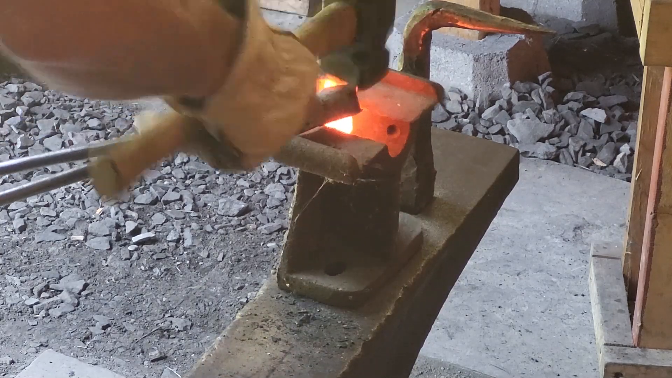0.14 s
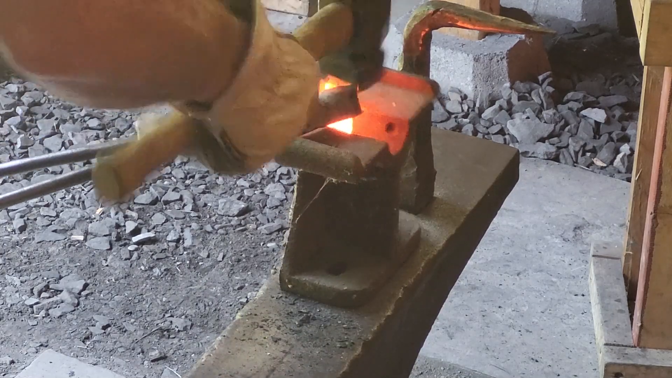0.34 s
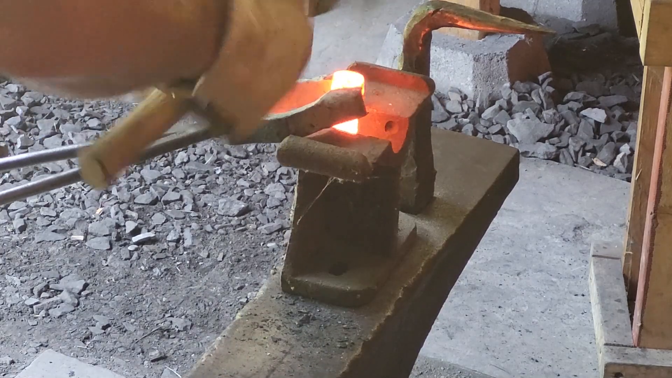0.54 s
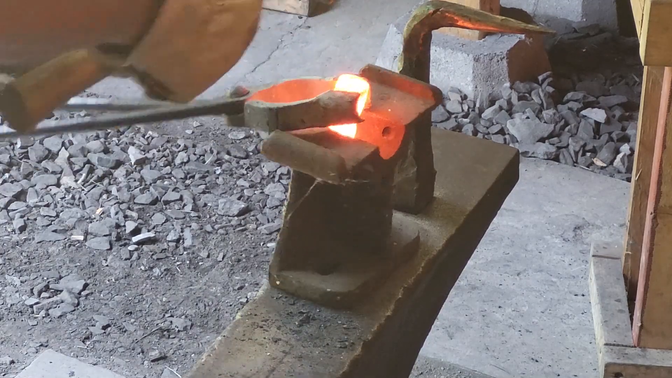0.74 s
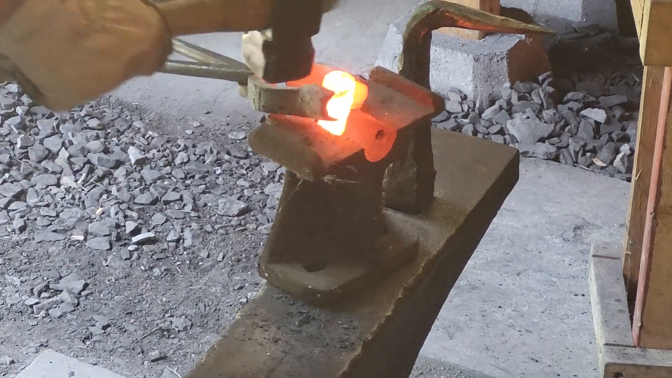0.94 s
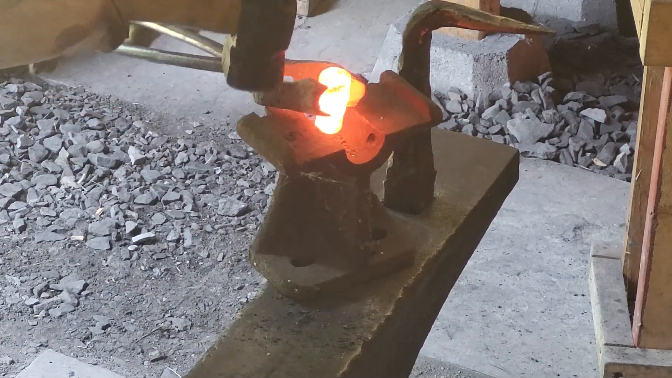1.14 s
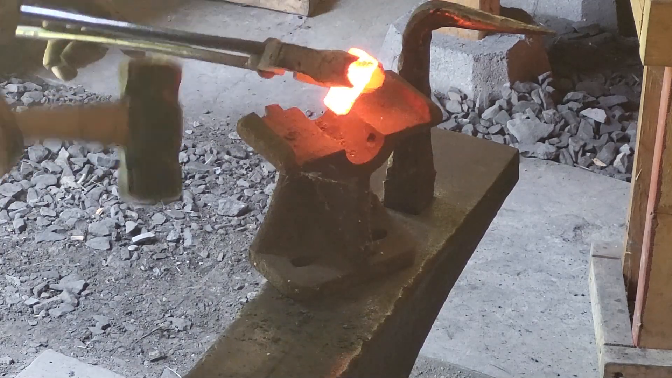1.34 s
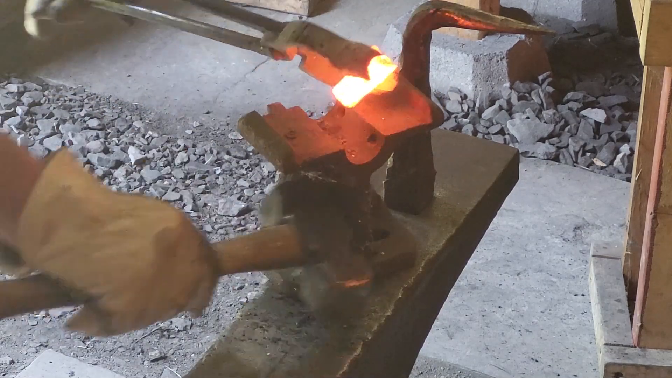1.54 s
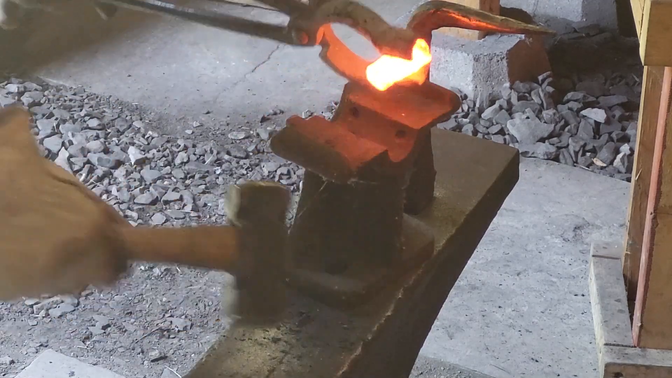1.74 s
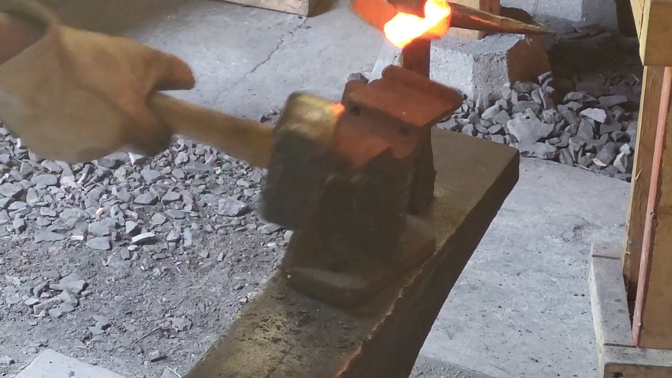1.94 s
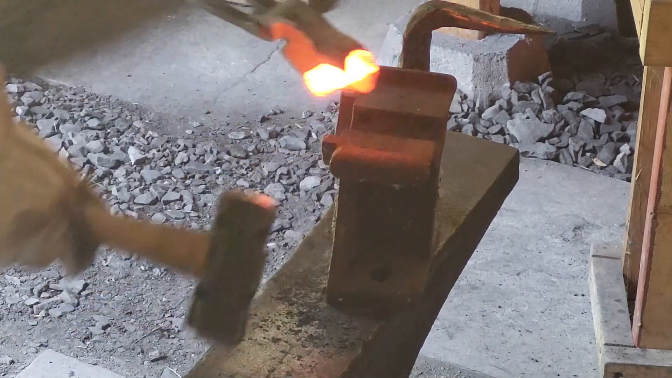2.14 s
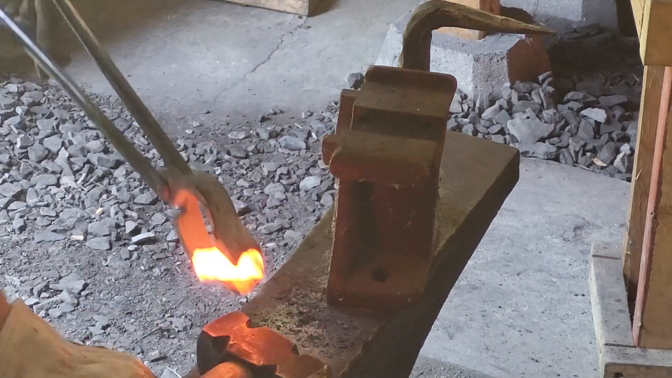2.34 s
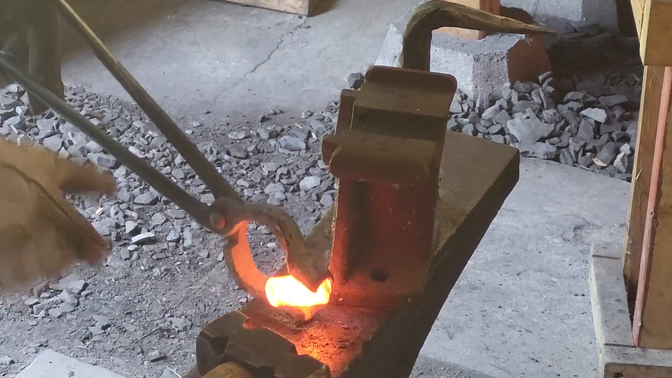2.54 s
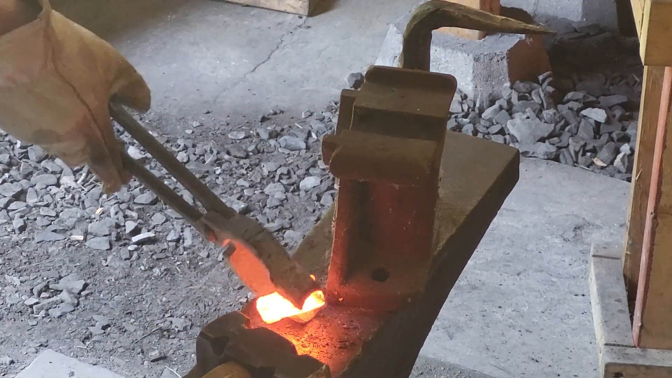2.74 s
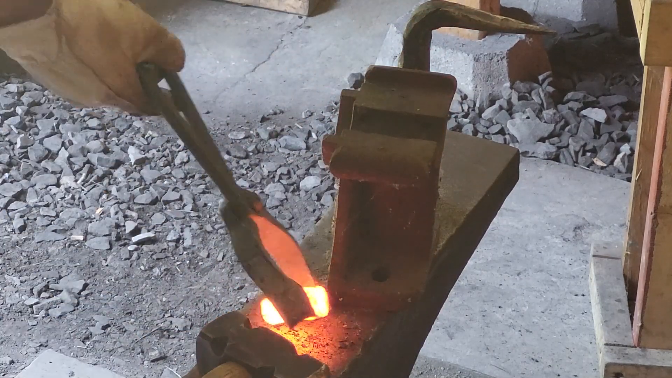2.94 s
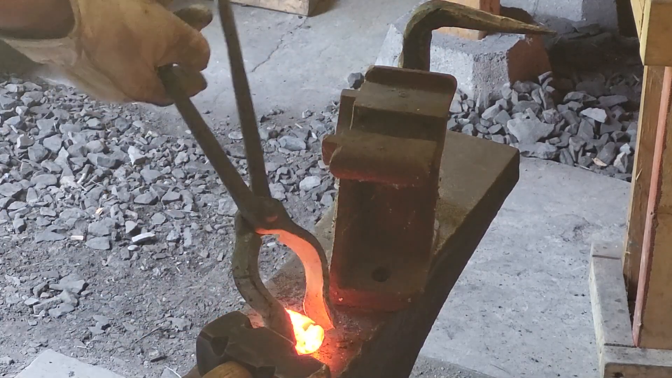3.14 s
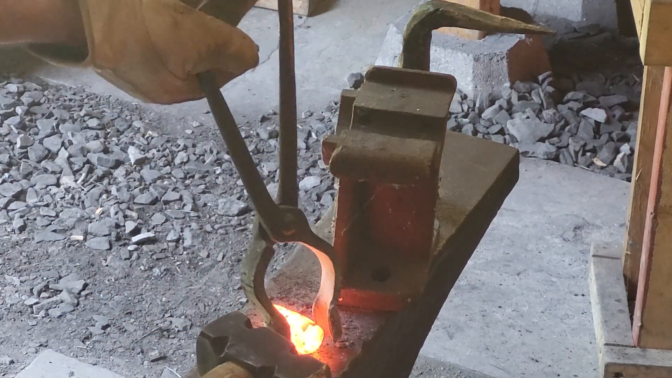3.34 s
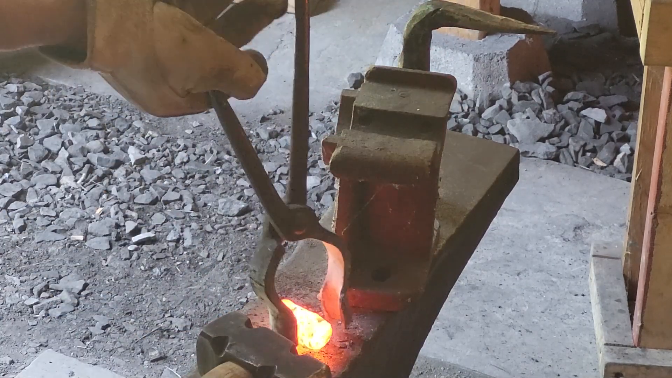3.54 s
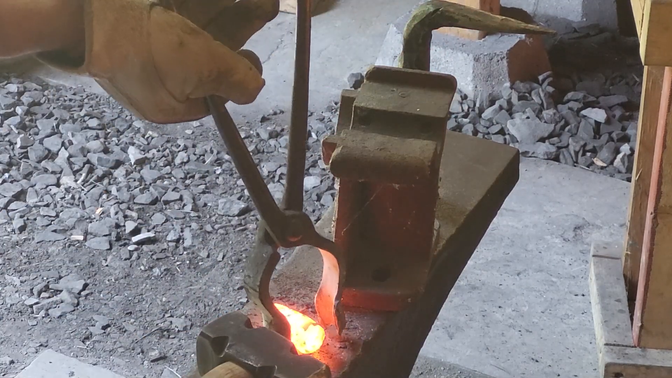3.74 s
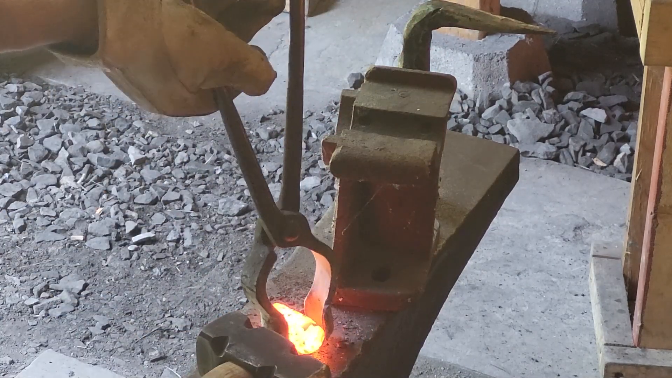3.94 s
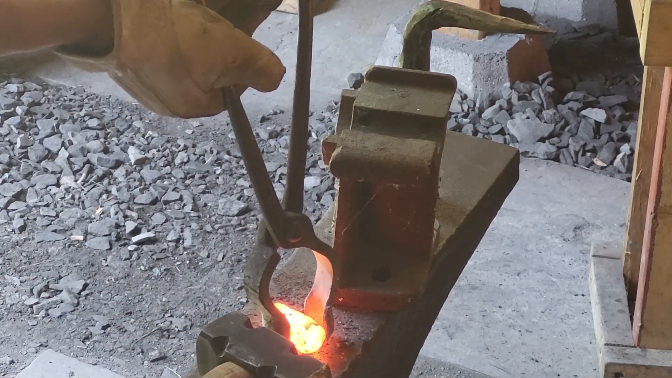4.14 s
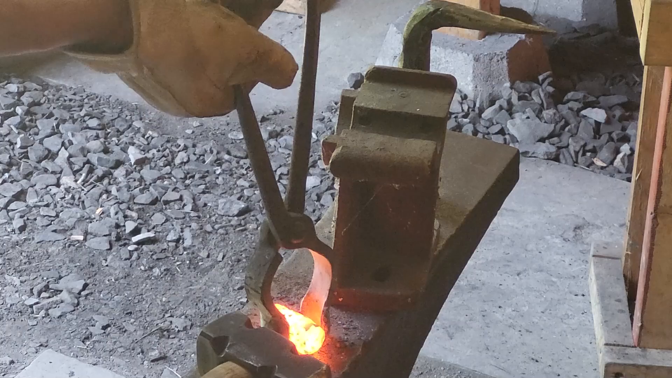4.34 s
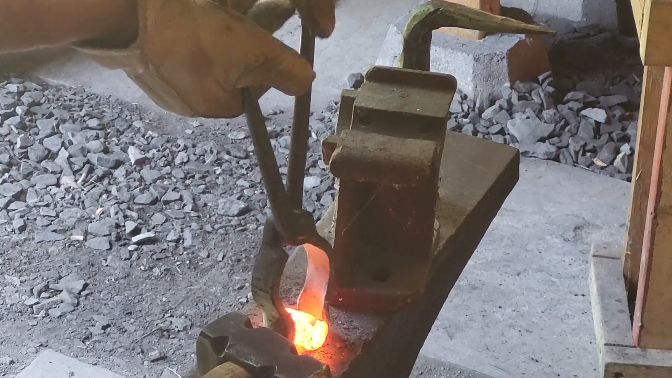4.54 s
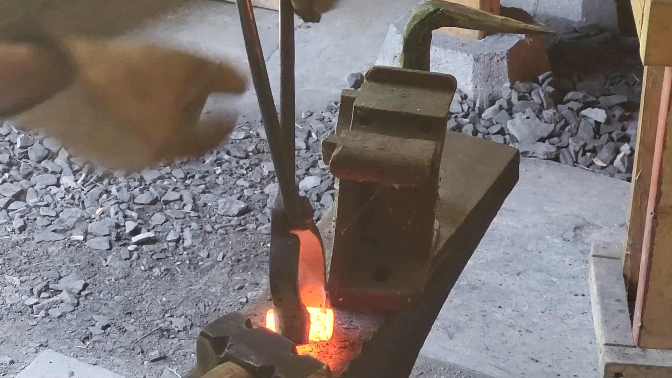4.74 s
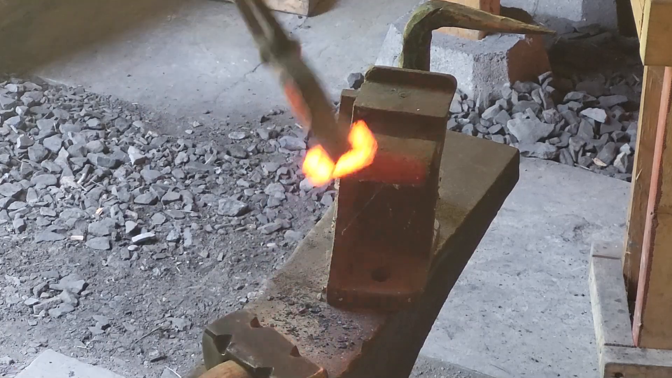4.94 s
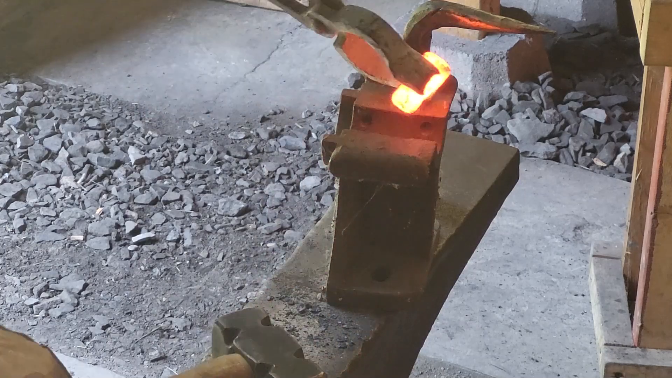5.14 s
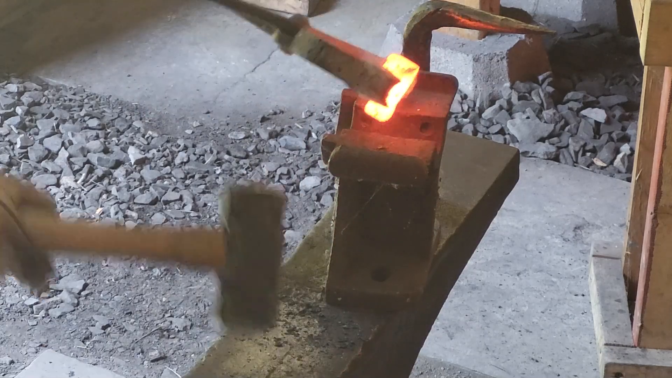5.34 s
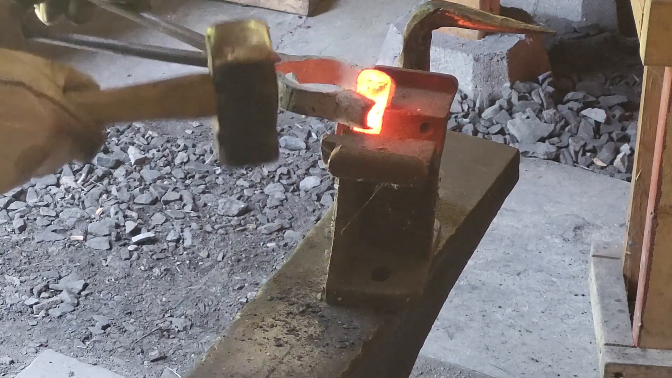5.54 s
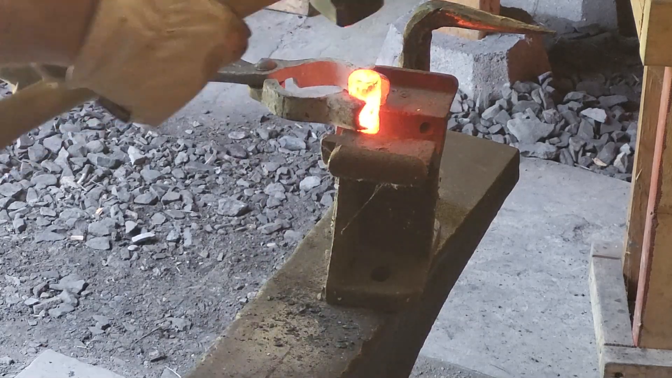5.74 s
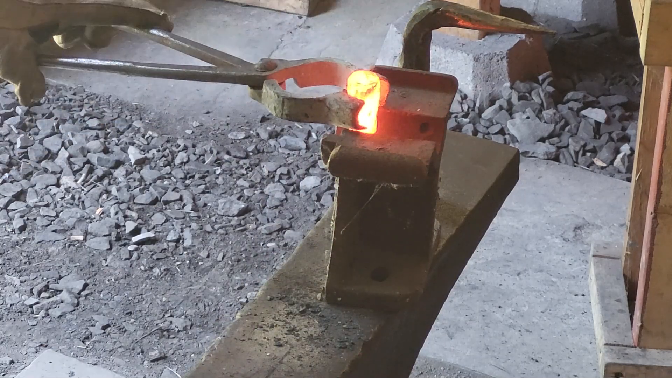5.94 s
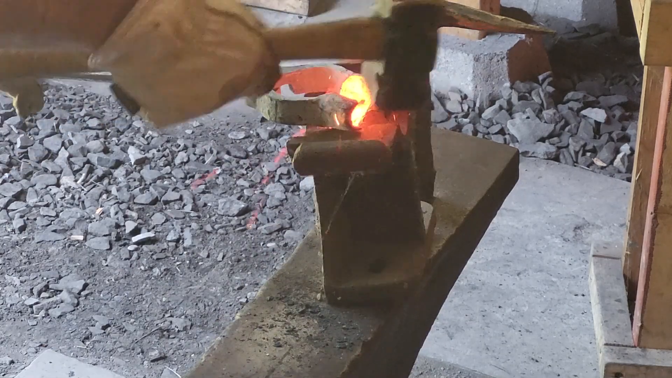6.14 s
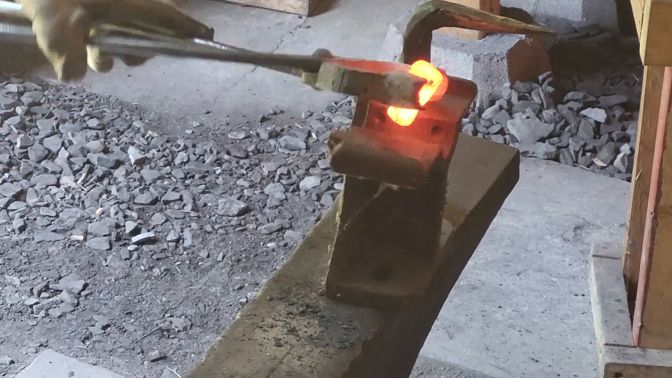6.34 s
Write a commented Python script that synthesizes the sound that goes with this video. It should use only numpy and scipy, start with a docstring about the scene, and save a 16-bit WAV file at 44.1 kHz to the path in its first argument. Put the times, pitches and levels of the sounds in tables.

```python
"""A heavy hammer blow is already ringing at the start: more blows on a small steel anvil follow.
Each one layers noise bursts (thud, crack, sizzle) with decaying modes of anvil, frame and bench, and the
tongs ring along, a long note near 2.4 kHz. Tools knock on the wood; iron and tongs scrape and drag as
shaped noise, and the scrapes also excite the anvil. Behind it lie a low rumble and an insect's faint
pulsing buzz, both filtered noise."""
import sys
import numpy as np
from scipy import signal
from scipy.fft import rfft, irfft, next_fast_len
from scipy.io import wavfile

SR = 44100
rng = np.random.default_rng(int(sys.argv[2]) if len(sys.argv) > 2 else 0)


def transcribe(signal):
    """Save signal, clipped to [-1, 1], as a 16-bit WAV file at the path in sys.argv[1]."""
    frames = np.atleast_2d(signal).T
    limited = np.clip(frames, -1, 1)
    pcm = np.round(limited * 32767).astype(np.int16)
    wavfile.write(sys.argv[1], SR, pcm)


N = 282240  # length in samples

# Hammer and iron on the anvil; force 0 is a full blow, hardness is low where soft hot iron cushions the
# steel, weight is the follow-through into the bench: (t/s, force level/dB, hardness/dB, weight/dB)
BLOWS = [(-.03, -4, -4, -2), (0.1371, -29, -5.5, 0), (.1955, -1, 1.5, -1), (.395, 0.84, 2.2, -2.5),
         (.6089, .5, -1.1, 1.5), (0.83, -38.5, -12.5, 1), (1.0842, -37, -6, -3), (1.5502, -17.5, -4, 2.5),
         (1.5605, -22.5, 0.5, -6), (1.9907, -12, 10, -4), (5.162, -19, -9.5, 4.5),
         (5.2438, -35, -11.5, -13), (5.3324, -20.5, -3.5, -6.5), (5.4385, -27.5, -14.5, -2),
         (5.4917, -25, -13.5, 10), (5.5845, -25, -9.5, 3), (5.6097, -28, -2, -13), (5.8655, -14.5, -3, 8),
         (6.151, 4, -5, -3), (6.3059, -33.5, -7.5, 9)]
# The hammer's side clinks on the anvil, levels before the layer trims:
# (t/s, crack level/dB, thud level/dB, sizzle level/dB, boom level/dB, head ring level/dB)
CLINKS = [(1.6118, -16.5, -28.5, -33.5, -42.5, -27.5)]
# Hammer, tongs and iron knock on the bench:
# (t/s, force level/dB, hardness/dB, tongs ring level over the force/dB)
KNOCKS = [(.956, -50, -26.5, -21.5), (1.355, -52.5, -27.5, -21), (2.2873, -38, 12, -2),
          (2.2965, -23.5, 10.5, -3), (2.335, -28, 5, -20), (2.6184, -43.5, -13, -15),
          (2.803, -57.5, 7, -10), (3.008, -60.5, 2.5, -4), (3.1494, -53, -18.5, -0.5),
          (3.21, -60, -12.5, 9.5), (3.4604, -54.5, -8, -22), (3.6265, -51, -12, -11.5),
          (3.69, -53, -10, -25.5), (4.012, -70.5, 8, -4), (4.411, -74, -5, 0.5), (4.5644, -47, -24, -32.5)]
# The iron bumps bare wood: (t/s, force level/dB, hardness/dB)
BUMPS = [(3.2741, -31.5, -8.5), (3.7443, -42, -25)]
# Iron and tongs scrape: (peak t/s, rise t/s, level/dB, share of the contact on the anvil 0-1)
SCRAPES = [(.06, 0.032, -36.5, 0.2), (.809, 0.032, -69.5, 0.92), (1.0, 0.021, -57, 0.99),
           (1.035, 0.019, -41, 1), (1.147, 0.025, -37.5, 0.54), (2.611, 0.03, -43.5, 0.04),
           (2.98, 0.075, -63.5, 0.11), (3.22, .04, -56.5, 0), (5.05, 0.038, -53, 0), (5.375, 0.028, -36, 1),
           (5.45, .012, -44.5, 0.8), (5.635, 0.026, -32.5, 0), (6.35, .05, -63, 0.84)]
# The tongs rasp round the iron: (peak t/s, rise t/s, fall t/s, level/dB)
GRIP_RASPS = [(4.599, 0.018, 0.05, -53.5), (4.98, 0.011, 0.15, -59.5), (5.052, 0.0095, 0.023, -58.5)]
# The insect's buzz swells: (peak t/s, rise t/s, fall t/s, level/dB)
INSECT_SWELLS = [(2.9, .6, 0.44, -75), (5.2, 0.22, 0.15, -59)]

# Ringing modes of each solid body: (f/Hz, level/dB, t60/s, left-right level/dB)
ANVIL_MODES = [(3150, -21, .16, 1.5), (3290, -13.5, 0.23, 1), (3570, -16, 0.14, -3.5), (3555, -4, 0.21, -5),
               (3587, 3.5, 0.2, -2.5), (3660, -12.5, .13, -2.5), (4030, -22, 0.098, -0.5),
               (4770, -25.5, 0.15, 2), (5760, -26.5, .16, 1), (5920, -15.5, .14, 3.5), (6577, -3.5, .19, 2),
               (6670, -15, .14, 3.5), (6850, -22.5, 0.11, 3), (7670, -22, .17, -3.5), (7740, -16, 0.22, 0),
               (7920, -13.5, 0.28, 1), (8750, -24, 0.17, 6.5), (8740, -17, .19, 6), (9380, -32.5, .36, 2),
               (10900, -18, 0.14, 4), (11870, -25.5, 0.17, 7), (12800, -22, 0.26, 8.5),
               (13910, -23.5, 0.13, 12), (14760, -26.5, .19, 12)]
FRAME_MODES = [(311.4, -2, 0.22, 0.68), (375, -7, 0.18, 1), (539.2, 4, 0.18, 0), (660, 7.5, 0.11, 0.09),
               (736.7, -11.5, .17, 0.089), (813, 4, .17, 0.12), (904, -15, 0.23, 0.2),
               (1270, -18, 0.33, 0.0029)]
BENCH_MODES = [(102.9, 4.5, 0.48, 0.92), (117.46, 5, 0.41, 0.94), (194.6, -4, 0.42, 1)]
TONGS_MODES = [(2415, 0.5, .45, 0), (2850, -7.5, 0.24, .5), (3076, 2, 0.42, -3.5), (4840, -4, .19, 1),
               (6040, -4.5, 0.23, -2.5), (10060, -6, 0.4, 13), (12300, -11.5, 0.19, 3),
               (12450, -11, 0.18, 8), (13730, -6.5, .11, 9)]
HEAD_MODES = [(2024, 0.5, 0.12, 2.2), (3130, -2, 0.36, 2), (7020, -16, .17, 1), (11000, 1.5, 0.17, 9.2),
              (11750, -9, 0.12, 9.7), (14760, -18.5, 0.3, 3)]  # hammer head
JAW_MODES = [(2470, 2.5, 0.094, 6), (4950, -10, .16, 4.5)]  # jaws of the tongs as they close

# Noise colours, relative as each noise is brought to rms 1: (f/Hz, level/dB per Hz)
THUD_COLOUR = [(40, -41), (130, -13.5), (300, -4), (550, -2), (850, 1.5), (1050, -7), (1300, -5),
               (1800, -12.5), (2600, -11.5), (4500, -30.5)]
CRACK_COLOUR = [(500, -28.5), (1500, 1.5), (2500, 5.5), (3200, 4.5), (4300, 1.5), (5700, 4), (8000, -2),
                (10000, -16.5), (14000, -29.5)]
SIZZLE_COLOUR = [(5000, -29), (8500, 1), (11000, 0), (13000, -3), (15000, -7), (16000, -6)]
WOOD_COLOUR = [(60, -32), (150, 1.5), (250, 12.5), (400, 5), (900, -1.5), (3000, -45.5)]
GRIT_COLOUR = [(120, -37), (200, -12), (316, -7.5), (448, -19), (548, 5), (659, -7.5), (1020, -5.5),
               (1530, -4.5), (2470, -9), (3130, -5.5), (6170, -11.5), (15100, -19), (16000, -19)]  # scraping strokes
SLIDE_COLOUR = [(180, -12.5), (300, -4.5), (385, -13), (574, 1.5), (737, -17), (1390, -12), (2140, -42.5),
                (2520, -15.5), (3190, -5.5), (5700, -7), (6520, -25), (6850, -59), (7570, -26.5),
                (8790, -18), (16000, -39.5)]  # the dragged iron
GRIP_COLOUR = [(290, -29), (500, -4), (635, 2), (755, -9), (874, -1), (1170, -8), (1590, -7.5), (1920, -16),
               (2430, -21), (2710, -27), (3480, -2.5), (4250, -16), (5260, -9), (6170, -16), (12000, -29),
               (15600, -59.5), (22000, -120)]  # tongs on iron
AIR_COLOUR = [(15, -75), (25, -46.5), (82, -3.5), (206, -1), (373, -15), (427, -21.5), (531, -13.5),
              (1400, -33), (2480, -39), (3080, -38), (4610, -35), (8140, -36.5), (10700, -52.5),
              (12500, -44), (16000, -34)]  # workshop rumble
BUZZ_COLOUR = [(6000, -37), (8500, -3.5), (10500, -1.5), (12500, -2.5), (15500, -7)]  # insect

# Decay of the workshop, scaled by each burst's life: (f/Hz, t60/s)
ROOM_DECAY = [(100, 0.89), (260, 0.081), (700, 0.21), (1840, 0.18), (4850, 0.16), (12800, 0.2)]
# Stereo likeness of noise: (f/Hz, left-right likeness)
ALIKE = [(60, .93), (600, 0.89), (1300, 0.43), (3000, 0), (6000, 0.054), (12000, 0.041)]
# Stereo lean of noise: (f/Hz, left-right level/dB)
LEFT_LEAN = [(100, 4.5), (300, 0), (800, 0), (2200, 1), (5500, 3.5), (9000, 8), (12000, 8.5), (15000, 11.5)]

TOP_HZ = 15900  # band limit
RING_SIZE = SR  # samples in one ring
SCATTER_DB = 1.5  # spread of a mode's strength from one contact to the next
PORT_PHASE = 1.2  # left-right phase of modes from 3 kHz up, before its wander (radians)

# Layers of a full blow, before the layer trims
FULL_CRACK_DB, FULL_THUD_DB, FULL_SIZZLE_DB, FULL_BOOM_DB = -13.5, -14.5, -23, -29.5
FULL_RING_DB, FULL_TONGS_DB = -14.5, -37.5
SIZZLE_GROWS, BOOM_GROWS, TONGS_GROW = 0.87, 0.7, 0.18  # dB per dB of force
CRACK_HARDENS, TONGS_HARDEN = 0.78, -0.42  # dB per dB of hardness
TONGS_FOLLOW = 0.6  # dB per dB of weight
TONGS_WAKE_DB, TONGS_FADE = -12, 2.2  # at light touches the tongs hardly ring: extra dB lost per dB
SHARP_DB = -0.3  # tilt of a full blow's ring at hardness 0, dB per octave
HARD_TILT = 0.1  # harder contacts wake more high modes: dB per octave per dB of hardness
LIGHT_TOUCH_TILT = 0.04  # lighter, shorter contacts do too: dB per octave per dB of lost force
SETTLE_S, SETTLE_DB = 0.037, 3.5  # after its first loud moment the ring drops by this much
ANVIL_BLUR, RING_ATTACK_S = 0.4, 0.002  # waver of the anvil's ring (radians), rise time constant

KNOCK_SIZZLE_DB, KNOCK_BOOM_DB, KNOCK_WOOD_DB = -13, -12.5, -21  # over the force, before the trims
KNOCK_SIZZLE_HARDENS = 0.55  # dB per dB of hardness
BUMP_THUD_DB, BUMP_SIZZLE_DB, BUMP_BOOM_DB = 3, -17, -32  # first two over the crack, boom over the force

SING_DB = -43.5  # drive to the anvil's singing, the same however hard it is rubbed
SCRAPE_FALL = 1.1  # a stroke's fall over its rise
FIRM_DB = -40  # level of a firm stroke
SCRAPE_BRIGHT_DB, PRESS_BRIGHTENS = 0, 0.066  # a firm stroke's tilt in dB per octave, its change per dB
DRAG_S, DRAG_END_S, DRAG_RISE_S, DRAG_DB = 1.3956, 1.548, 0.083, -42.5  # start, stop, ramp, level
BITE_S, BITE_DB = 4.955, -54.5  # the jaws close on the iron
INSECT_REST_DB = -79.5  # floor under the swells


def blows():
    """Blows on the anvil: its two strongest modes beat; the tongs ring along near 2.4 kHz."""
    out, t = np.zeros((2, N)), np.arange(RING_SIZE) / SR
    # reflections from bench and floor pile up on the ring some 20 ms after the blow
    pile_up = amp(3.5 * np.exp(-((t - 0.019) / 0.007) ** 2))
    settle = amp(-SETTLE_DB * (1 + np.tanh((t - SETTLE_S) / 0.004)) / 2)
    for s, force_db, hard_db, weight_db in BLOWS:
        crack_db = FULL_CRACK_DB + force_db + CRACK_HARDENS * hard_db
        thud_db = FULL_THUD_DB + force_db
        sizzle_db = FULL_SIZZLE_DB + SIZZLE_GROWS * force_db
        boom_db = FULL_BOOM_DB + BOOM_GROWS * force_db + weight_db
        add(out, s, impact(crack_db, thud_db, sizzle_db, boom_db, hold=0.017, clang_db=12))

        anvil_db = FULL_RING_DB + force_db + hard_db
        sharp_db = SHARP_DB - LIGHT_TOUCH_TILT * force_db + HARD_TILT * hard_db
        anvil = ring(ANVIL_MODES, attack=RING_ATTACK_S, blur=ANVIL_BLUR, tilt_db=sharp_db)
        add(out, s, amp(anvil_db) * pile_up * settle * anvil)

        tongs_db = FULL_TONGS_DB + TONGS_GROW * force_db + TONGS_HARDEN * hard_db
        tongs_db += TONGS_FOLLOW * weight_db
        tongs_db -= TONGS_FADE * max(TONGS_WAKE_DB - force_db, 0)
        # the steep tilt leaves mostly the lowest mode
        add(out, s, amp(tongs_db) * ring(TONGS_MODES, attack=0.0034, blur=0.48, tilt_db=-60.5))
    return out


def clinks():
    """A glancing touch rings the hammer head itself."""
    out = np.zeros((2, N))
    for s, crack_db, thud_db, sizzle_db, boom_db, head_db in CLINKS:
        add(out, s, impact(crack_db, thud_db, sizzle_db - 9, boom_db, hold=0.0047, clang_db=2))
        add(out, s, amp(head_db + 3.5) * ring(HEAD_MODES, attack=0.00049, blur=0.38))
    return out


def knocks():
    """Tools land on the bench; soft contacts favour the tongs' lowest mode, hard ones wake all of them."""
    out = np.zeros((2, N))
    for s, force_db, hard_db, tongs_db in KNOCKS:
        crack_db = force_db + hard_db
        sizzle_db = force_db + KNOCK_SIZZLE_DB + KNOCK_SIZZLE_HARDENS * hard_db
        boom_db, wood_db = force_db + KNOCK_BOOM_DB, force_db + KNOCK_WOOD_DB
        add(out, s, bench_hit(crack_db, force_db, sizzle_db, boom_db, wood_db))
        softness = max(-20 - crack_db, 0)
        tongs_ring = ring(TONGS_MODES, attack=0.0034, blur=0.12, tilt_db=-softness)
        add(out, s, amp(force_db + tongs_db) * tongs_ring)
    return out


def bumps():
    """On bare wood the hollow knock leads and neither anvil nor tongs ring."""
    out = np.zeros((2, N))
    for s, force_db, hard_db in BUMPS:
        crack_db = force_db + hard_db
        thud_db, sizzle_db = crack_db + BUMP_THUD_DB, crack_db + BUMP_SIZZLE_DB
        add(out, s, bench_hit(crack_db, thud_db, sizzle_db, force_db + BUMP_BOOM_DB, wood_db=force_db))
    return out


def scrapes():
    """Scale grinds in short strokes, brighter when pressed; its tiny slips keep the anvil singing."""
    t, grit, chatter = np.arange(N) / SR, np.zeros((2, N)), np.zeros((2, N))
    for s, rise, db, on_anvil in SCRAPES:
        start = max(s - 0.25, 0)
        u = t[:RING_SIZE // 2] + start - s  # time from the stroke's peak
        slips = unit(amp(1.3 * wobble(560, size=len(u)) + 1.1 * wobble(60, size=len(u))))
        bright_db = SCRAPE_BRIGHT_DB + PRESS_BRIGHTENS * (db - FIRM_DB)
        stroke = swell(u, rise, SCRAPE_FALL * rise)
        rub = stroke * slips * noise(GRIT_COLOUR, size=len(u), tilt_db=bright_db)
        add(grit, start, amp(db) * rub)
        add(chatter, start, amp(SING_DB) * np.clip(on_anvil, 0, 1) * rub)
    steel = ring(ANVIL_MODES, attack=0.001, blur=0.2, tilt_db=17)
    steel = steel * np.exp(-t[:RING_SIZE] / 0.039)  # the resting iron damps it
    singing = signal.fftconvolve(chatter, steel / np.linalg.norm(steel[0]), axes=1)[:, :N]
    return grit + singing


def drag():
    """The iron gathers speed over the anvil face, slides evenly and stops; level follows speed."""
    t = np.arange(N) / SR
    speed = np.clip((t - DRAG_S) / DRAG_RISE_S, 0, 1) * (t < DRAG_END_S)
    return speed * amp(DRAG_DB + 1.2 * wobble(67, size=N)) * noise(SLIDE_COLOUR, size=N)


def tongs_grip():
    """The jaws rasp as they take a new grip, and ring briefly as they close."""
    t = np.arange(N) / SR
    level = sum(amp(db) * swell(t - s, rise, fall) for s, rise, fall, db in GRIP_RASPS)
    out = level * amp(1.2 * wobble(300, size=N)) * noise(GRIP_COLOUR, size=N)
    add(out, BITE_S, amp(BITE_DB) * ring(JAW_MODES, attack=0.0094, blur=0.79))
    return out


def insect():
    """High noise, pulsed about 23 times a second, swells over a faint floor."""
    t = np.arange(N) / SR
    pulses_db = 2.7 * np.sin(2 * np.pi * 23 * t + wobble(2.7, size=N))
    swells = sum(amp(db) * swell(t - s, rise, fall) for s, rise, fall, db in INSECT_SWELLS)
    return (amp(INSECT_REST_DB) + swells) * amp(pulses_db) * noise(BUZZ_COLOUR, size=N)


def rumble():
    """The workshop's low rumble: coloured noise whose level wavers slightly."""
    return amp(-60.5 + 0.85 * wobble(44, size=N)) * noise(AIR_COLOUR, size=N)


def impact(crack_db, thud_db, sizzle_db, boom_db, hold, clang_db):
    """What every contact shares: a dull frame thud, a steel crack, crushed scale and the bench's boom."""
    out = amp(boom_db - 3.5) * ring(BENCH_MODES, attack=0.017, blur=0.34)
    out += amp(thud_db - 10.5) * ring(FRAME_MODES, attack=0.002, blur=0.3)
    add(out, 0, amp(thud_db - 5.5) * burst(THUD_COLOUR, hold, life=1))
    add(out, 0, amp(crack_db - 4) * burst(CRACK_COLOUR, hold * 0.7, life=1, clang_db=clang_db * 0.56))
    add(out, 0, amp(sizzle_db) * burst(SIZZLE_COLOUR, hold * 1.2, life=0.67, clang_db=clang_db))
    return out


def bench_hit(crack_db, thud_db, sizzle_db, boom_db, wood_db):
    """A contact on the bench: a dry tick, a short impact and the knock of the wood."""
    out = impact(crack_db - 2, thud_db, sizzle_db, boom_db, hold=0.005, clang_db=-7)
    tick = np.exp(-np.arange(RING_SIZE // 40) / SR / 0.0015)
    add(out, 0, amp(crack_db) * tick * noise(CRACK_COLOUR, size=len(tick)))
    add(out, 0, amp(wood_db - 3) * burst(WOOD_COLOUR, hold=0.0052, life=0.392))
    return out


def ring(modes, attack, blur, tilt_db=0):
    """Decaying modes, struck at new strengths; reflections make their phase and level waver."""
    t, out = np.arange(RING_SIZE) / SR, np.zeros((2, RING_SIZE))
    for hz, db, t60, left_db in modes:
        u = t[:int(min(1.2 * t60, 1) * SR)]
        curves = blur * rng.standard_normal((3, 64))  # 90 knots a second
        shared, own, level_curve = [np.interp(u * 90, np.arange(64), knots) for knots in curves]
        apart = PORT_PHASE * min(hz / 3000, 1) + own
        phase = 2 * np.pi * hz * u + shared - shared[0] + apart * np.array([[0.5], [-0.5]])
        waver_db = 8 * level_curve * np.minimum(u / 0.04, 1)  # grows in over 40 ms
        strength_db = db + SCATTER_DB * rng.standard_normal() + tilt_db * np.log2(hz / modes[0][0])
        fade = amp(strength_db + waver_db - 60 * u / t60)
        out[:, :len(u)] += sides(left_db) * fade * np.sin(phase)
    return out * (1 - np.exp(-t / attack))


def burst(colour, hold, life, clang_db=0):
    """Dense ringing and near walls: full for hold seconds, then each band dies at its own speed."""
    hz, t, z = signal.stft(noise(colour, size=RING_SIZE // 3), SR, nperseg=256)
    t60 = life * along(ROOM_DECAY, hz)[:, None]
    fade = amp(-60 * np.maximum(t - hold, 0) / t60)
    # positive clang gathers what stays in the room round the anvil's modes, negative thins it there
    high = hz[:, None] > 3000
    gap_hz = np.abs(hz[:, None] - np.array(ANVIL_MODES)[:, 0]).min(axis=1, keepdims=True)
    between = (1 - np.exp(-(gap_hz / 170) ** 2)) * high
    clang = amp(clang_db * (0.3323 - between) * (1.5 - np.exp(-t / 0.029)) * high)
    x = signal.istft(z * fade * clang, SR, nperseg=256)[1]
    return x * (1 - np.exp(-np.arange(x.shape[1]) / SR / 0.0005))


def noise(colour, size, tilt_db=0):
    """Stereo noise of rms 1: alike in the bass, nearly unrelated and leaning left in the treble."""
    hz = np.fft.rfftfreq(size, 1 / SR)
    turn = np.arccos(np.clip(along(ALIKE, hz), -1, 1)) / 2  # splits power between mid and side
    gain = amp(along(colour, hz) + tilt_db * np.log2(1 + hz / 500)) * (hz < TOP_HZ)
    mid, side = rfft(rng.standard_normal((2, size))) * gain * [np.cos(turn), np.sin(turn)]
    stereo = np.array([mid + side, mid - side]) * sides(along(LEFT_LEAN, hz))
    return unit(irfft(stereo, size))


def swell(u, rise, fall):
    """A rounded peak of height 1 at u = 0 with exponential flanks."""
    return np.exp(1 - np.sqrt(1 + 2 * (u / np.where(u < 0, rise, fall)) ** 2))


def wobble(rate, size):
    """A slow random curve of spread 1.2 at its knots, rate knots a second."""
    knots = 1.2 * rng.standard_normal(int(size * rate / SR) + 2)
    return np.interp(np.arange(size) * rate / SR, np.arange(len(knots)), knots)


def amp(db):
    """Decibels to gain."""
    return 10 ** (np.asarray(db) / 20)


def unit(x):
    """x at rms 1."""
    return x / np.sqrt(np.mean(x ** 2) + 1e-20)


def along(points, hz):
    """(f/Hz, value) points read on a log frequency axis."""
    f, v = np.transpose(points)
    return np.interp(np.log(hz + 1), np.log(f + 1), v)


def sides(left_db):
    """Left and right gains for a level difference."""
    return amp(np.array([[0.5], [-0.5]]) * left_db)


def add(track, s, sound):
    """Mix a sound into the track from time s, trimming what falls outside."""
    start = round(s * SR)
    part = sound[:, max(-start, 0):N - start]
    track[:, max(start, 0):][:, :part.shape[1]] += part


def scene():
    """All the work at the anvil with one echo from a near wall, over insect and rumble."""
    work = blows() + clinks() + knocks() + bumps() + scrapes() + drag() + tongs_grip()
    # a high-pass at 62 Hz keeps the deep bass thin
    work = signal.sosfilt(signal.butter(3, 62, "highpass", fs=SR, output="sos"), work)
    echo = np.pad(work, ((0, 0), (round(0.062 * SR), 0)))[:, :N]
    return work + amp(-27) * echo + insect() + rumble()


def record(dry):
    """Soft limiting rounds off the highest peaks, then nothing is kept above the band limit."""
    rounded = dry / (1 + np.abs(dry / 0.9) ** 4) ** (1 / 4)
    size = next_fast_len(N + SR // 2)
    in_band = np.fft.rfftfreq(size, 1 / SR) < TOP_HZ
    return irfft(rfft(rounded, size) * in_band, size)[:, :N]


dry = scene()
out = record(dry)
transcribe(out)
```